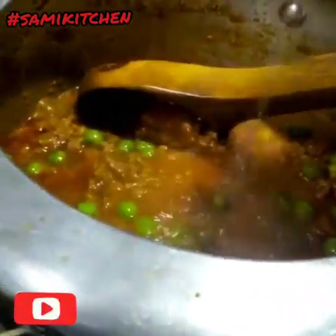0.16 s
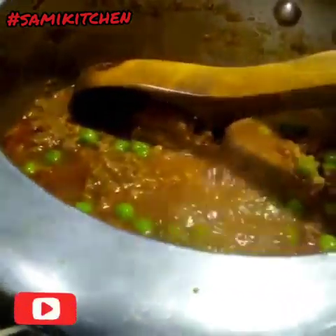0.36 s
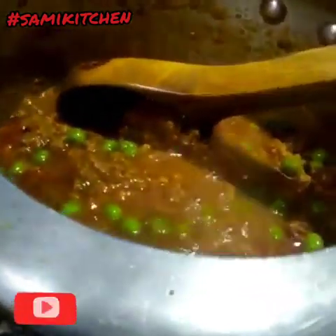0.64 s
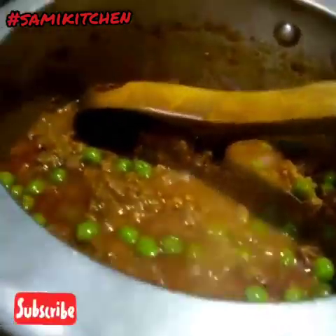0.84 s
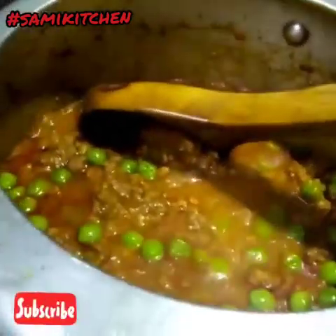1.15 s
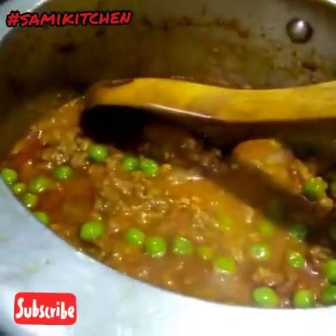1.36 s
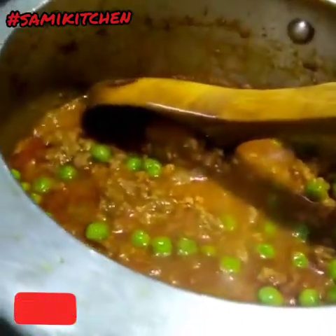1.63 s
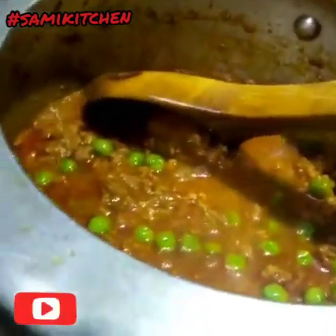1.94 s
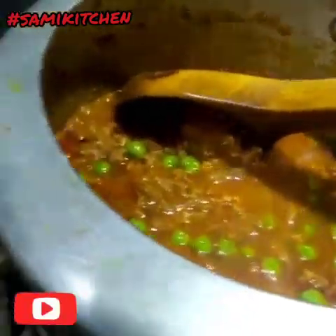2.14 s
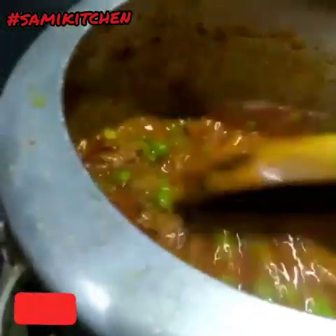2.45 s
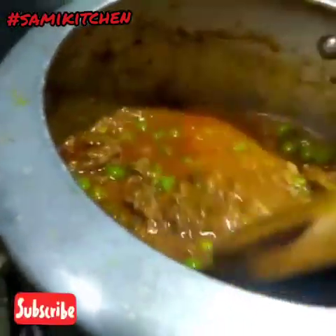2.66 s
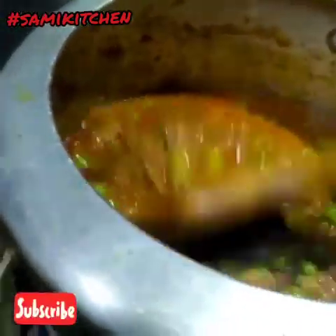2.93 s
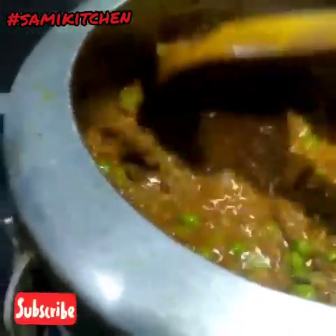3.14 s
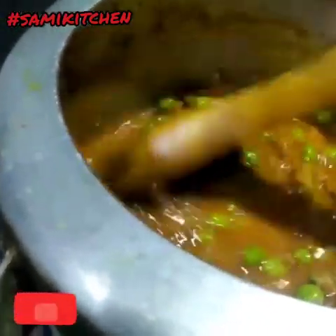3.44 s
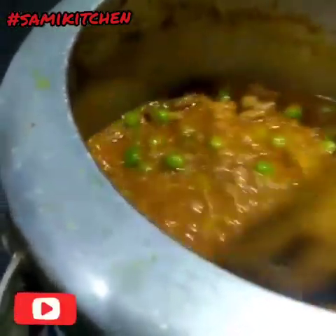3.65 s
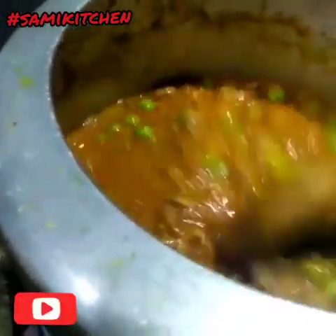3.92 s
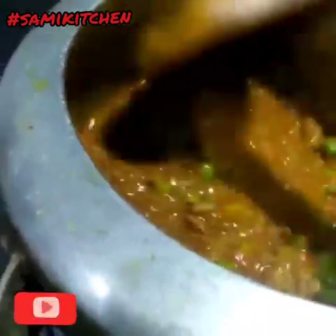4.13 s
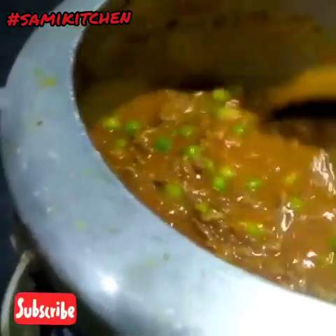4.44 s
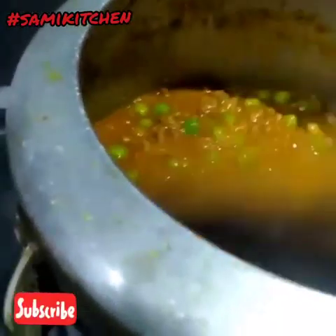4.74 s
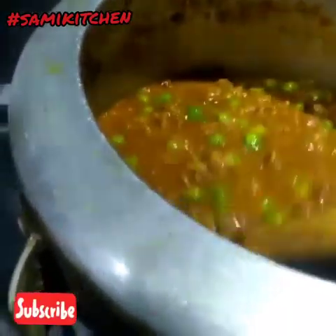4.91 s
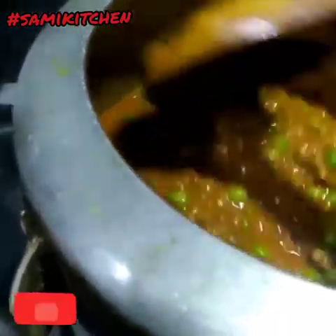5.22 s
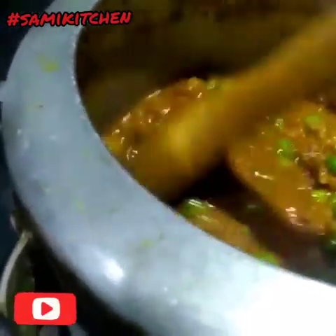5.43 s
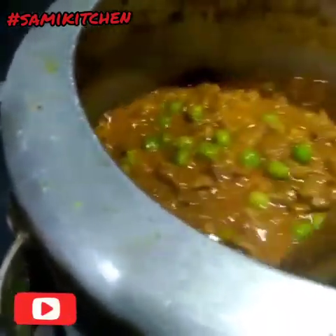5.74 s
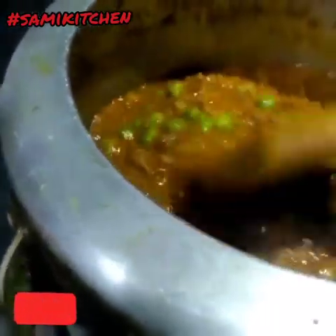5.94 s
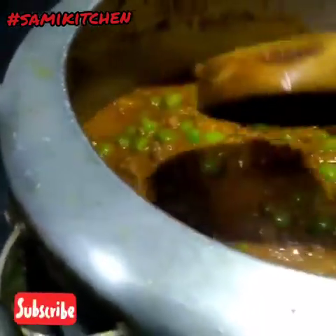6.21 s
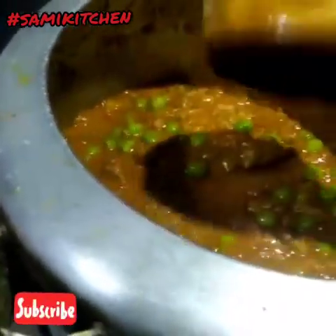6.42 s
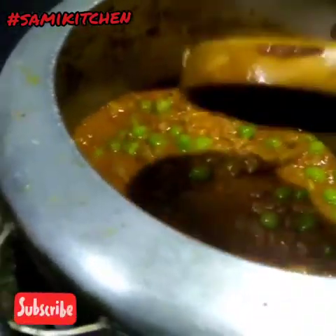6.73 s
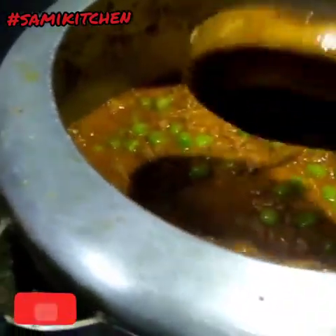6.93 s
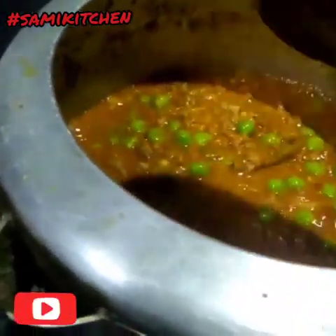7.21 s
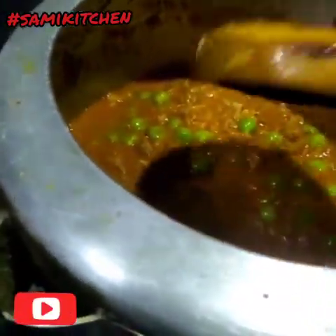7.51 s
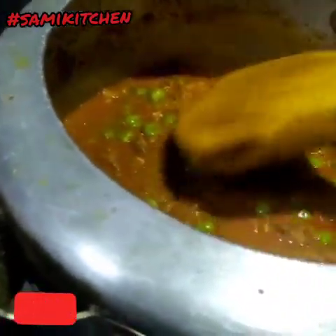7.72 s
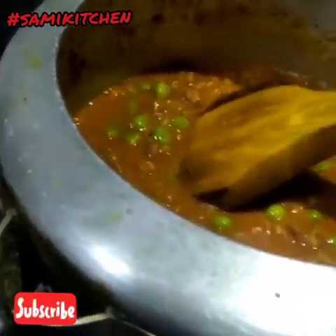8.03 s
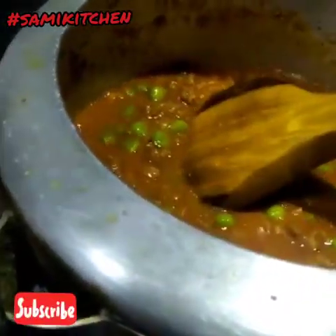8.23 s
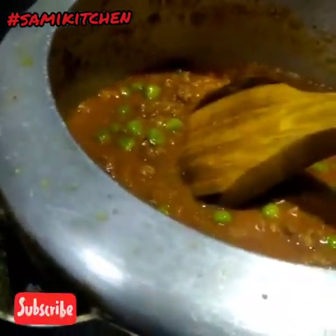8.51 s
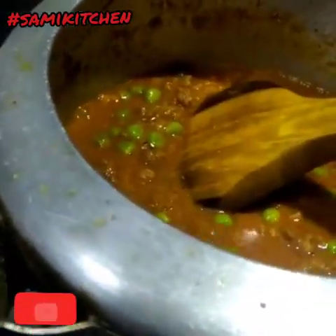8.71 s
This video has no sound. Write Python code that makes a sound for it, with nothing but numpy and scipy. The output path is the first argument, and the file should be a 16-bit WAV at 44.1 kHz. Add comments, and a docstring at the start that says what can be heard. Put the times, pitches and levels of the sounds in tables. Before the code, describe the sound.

Liquid pours with a hiss into a metal pot of stew, then a wooden spoon stirs, scrapes and thumps the rim, rattling the pot.

```python
"""Water is poured into a thick metal pot of stew; a wooden spoon then stirs, rubs and knocks the wall,
and is tapped on the rim so that the pot thuds and rattles on its stand. A small hard kitchen answers;
the microphone is near, dull above 4 kHz."""
import sys
import numpy as np
from scipy import signal
from scipy.fft import rfft, irfft, next_fast_len
from scipy.io import wavfile
from scipy.ndimage import uniform_filter1d, map_coordinates

SR = 44100
rng = np.random.default_rng(int(sys.argv[2]) if len(sys.argv) > 2 else 0)


def unload_audio(sound):
    """Save the sound as a 16-bit wav file, at the path given as the first command line argument."""
    columns = np.transpose(np.atleast_2d(sound))
    # keep every value between -1 and 1, then stretch to whole-number steps
    steps = np.round(np.clip(columns, -1, 1) * 32767)
    wavfile.write(sys.argv[1], SR, steps.astype(np.int16))


N = 391010

# knocks on the wall and rattles on the stand: (s, peak dB, strength near 900 Hz dB, near 1700 Hz dB, click dB)
KNOCKS = [(0.335, -32, -8, -42, -10), (1.235, -24.5, -22, -11, -34), (1.3, -28, -1.5, -5, -50), (1.336, -22.5, 5, 31, -25.5), (1.568, -20.5, 0.5, -2, -47),
          (1.61, -20.5, -4.5, -3.5, -56), (2.213, -39.5, -9, -20, -3), (2.706, -35, -23, -38, -26), (3.124, -44.5, -12, -18, -32),
          (3.65, -29, -25, -29, -14.5), (3.69, -32.5, -18, -18, -17), (3.747, -35, 0, -31, -32), (3.946, -26.5, -26, -4.5, -57), (4.259, -37, -44, -67, -36),
          (4.354, -25.5, 30, 26, -60), (4.427, -44, -23, -38, -6), (4.585, -22, -35, -27.5, -32), (4.936, -26, -54, -12.5, -15),
          (5.469, -11, -9, -19, -52), (5.725, -41, -21, -28.5, -45), (6.421, -12.5, -32, -18.5, -29.5), (6.478, -23.5, -14, -11, -29.5),
          (6.552, -31.5, -17, -18.5, -40), (6.617, -11.5, -19, -19, -29), (6.834, -15.5, -20, -10.5, -27), (6.849, -15.5, -5, -15.5, -30),
          (6.867, -25, -23.5, -15, -25.5), (6.921, -24, -15, -17.5, -35.5), (6.937, -39.5, -18, -16, -9.5), (7.016, -24, 1, -1, -20.5), (7.033, -16.5, -19.5, -15, -25.5),
          (7.48, -19, -3.5, -15.5, -21), (7.502, -18, -23, -12, -21), (7.655, -37, -22, -3.5, -50), (8.433, -44.5, 17, 13, -35)]
# the whole pot jolts on its stand: (s, peak dB, pitch Hz, rumble dB)
THUDS = [(1.2, -37, 289, -22), (2.753, -28.5, 214, -14), (3.941, -23, 213, -9), (4.349, -27, 460, -35), (5.48, -29.5, 366, -27), (6.408, -14.5, 220, -14.5), (6.607, -12, 222, -8.5),
         (6.825, -11.5, 221, -28), (6.849, -16, 369, -4.5), (7.006, -13, 230, -9.5), (7.476, -10.5, 328, -10.5), (7.494, -12, 218, -14)]
# modes of the wall: (Hz, dB)
POT = [(590, 17.5), (770, 10.5), (860, 4), (955, 15.5), (1080, 6), (1225, 6), (1350, 5), (1435, 6), (1760, 0.5), (1970, 6), (2130, 7), (2390, -2),
       (2620, -16), (2800, 4.5), (2930, -6), (3090, -4.5), (3185, 1.5), (3330, -6), (3540, 1), (3750, -1), (4000, -0.5), (4300, -8.5)]
BODY = [(171, 32, -12.5), (224.6, 16, -4.5), (271, 12, -2), (373, 52, 8.5), (515, 23, -2.5)]  # pot and stand: (Hz, width Hz, dB)
FIZZ = [(2650, -14.5), (4500, -3.5), (4790, -9.5), (5380, -5), (6240, -6), (7940, -10), (12200, -4.5), (15800, -10)]  # (Hz, dB per Hz)
HUSH = [(12, -38), (20, -7), (101, 3), (247, -4), (496, -1), (1180, -14.5), (1390, -12.5), (1900, -21), (3220, -16.5),
        (5040, -31.5), (15800, -28.5)]  # flame and room: (Hz, dB per Hz)
HUSH_DB = -55.5
KITCHEN = [(200, 0.33), (1000, 0.29), (3000, 0.28), (8000, 0.22)]  # (Hz, t60 s)
TOP_HZ = 15800  # fixed
# one pitch sings out of the wet wall for a moment: (s, length s, Hz, dB)
NOTES = [(0.02, 0.84, 2157, -41.5), (0.091, 0.21, 763, -42), (0.13, .06, 600, -42), (0.18, .12, 960, -46), (0.296, 0.15, 1410, -51.5), (0.358, 0.66, 2138, -49.5), (0.508, 0.049, 1376, -40),
         (0.534, 0.38, 2770, -55), (0.777, 1, 3550, -56.5), (1.03, 0.21, 3080, -47.5), (1.033, 0.1, 2120, -49.5), (1.195, 0.053, 1430, -44), (1.48, 0.076, 3560, -54),
         (1.976, 0.12, 2117, -52), (2.047, 0.47, 1415, -47), (2.422, 0.13, 2010, -55), (2.426, 0.059, 2746, -45.5),
         (2.532, 0.15, 1223, -48), (2.543, 0.11, 2030, -57), (2.739, 0.082, 1026, -43), (2.75, 0.058, 1930, -39.5),
         (2.751, 0.3, 1243, -50.5), (2.937, 0.084, 3030, -50.5), (3.109, 0.1, 969, -47.5), (3.154, 0.085, 1730, -49.5), (3.326, 0.057, 954, -47.5),
         (3.524, 0.24, 2916, -52.5), (3.66, 0.18, 1205, -38), (3.638, 0.078, 1997, -38.5), (3.674, 0.19, 3950, -54),
         (4.335, 0.045, 2150, -51), (4.432, 0.1, 2800, -59.5), (4.626, 0.2, 1196, -45), (4.653, 0.15, 2393, -44), (5.022, 0.095, 1840, -46), (5.047, 0.2, 1274, -47),
         (5.128, 0.1, 4004, -53), (5.134, 0.13, 3290, -56), (5.187, 0.12, 2120, -49.5), (5.664, 0.13, 1214, -44.5), (5.716, 0.043, 2125, -43.5),
         (5.733, 0.43, 2860, -62), (5.928, 0.37, 3210, -51.5), (6.196, 0.035, 1420, -53.5), (7.116, 0.61, 4325, -56), (7.14, 0.058, 2183, -49.5), (7.296, 0.026, 2190, -56),
         (7.429, 0.048, 2190, -47), (7.645, 0.051, 1087, -45), (7.647, 0.074, 358.6, -43), (7.787, 0.06, 1420, -55),
         (7.918, 0.088, 5350, -64), (7.949, 0.54, 4230, -60), (8.129, .03, 2260, -55), (8.325, 0.27, 3470, -62), (8.399, 0.085, 1420, -48.5), (8.46, .06, 3900, -61), (8.517, 0.041, 3430, -56), (8.565, 0.12, 1340, -42.5),
         (8.671, 0.076, 3510, -47.5), (8.772, 0.22, 4050, -54.5), (8.774, 0.065, 1407, -46), (8.819, 0.05, 985, -48)]
RUMBLE = [(96, 13, -1.5), (176, 33, -2)]  # stove top: (Hz, width Hz, dB)
# unevenness: lumps in a note dB, hum wavering dB, ring patches dB, fizz streaks dB, slips of the spoon dB
LUMP_DB, HUM_WAVER_DB, STREAK_DB, FIZZ_STREAK_DB, SLIP_DB = 4.5, 3.5, 5.5, 5, 2.5  # fixed
CRACK, BLOW_RISE = 1.2, .0014  # fixed
RIM_HZ = [5010, 5520, 6110, 6800, 7500, 8680, 10000, 11670, 11200]  # thin high modes that colour the fizz
# the poured stream dwindles: (s, flow dB)
POUR = [(0, -28.5), (0.17, -26.5), (0.42, -29.5), (0.7, -38), (1.0, -42), (1.5, -49.5), (2.1, -66.5)]
POUR_LOW_DB, POUR_MID_DB, POUR_FIZZ_DB, FIZZ_FOLLOWS = -15.5, -9.5, -18.5, 0.75  # over the high ring; the fizz dies slower than the flow
# the spoon drags along the wall: (s, length s, low ring dB, high ring dB, wet fizz dB)
STROKES = [(1.248, 0.11, -23.5, -28.5, -62), (2.203, 0.13, -53, -60, -61), (2.394, .12, -39.5, -50, -62.5), (2.51, 0.11, -63, -58, -56.5),
           (2.631, 0.15, -43.5, -38, -59.5), (2.963, 0.096, -43.5, -52.5, -55), (3.325, 0.24, -51.5, -54, -67), (3.642, .18, -37, -35.5, -59),
           (3.946, .12, -32.5, -47, -73), (4.256, 0.065, -55, -58, -70), (4.37, 0.044, -39, -76, -71), (4.6, 0.1, -36, -39, -58.5), (4.732, 0.07, -34, -42, -57.5),
           (4.957, .1, -69, -34, -58), (5.136, 0.12, -35, -52, -72.5), (5.568, 0.2, -36.5, -64, -78), (5.888, 0.6, -61.5, -69, -92),
           (7.658, 0.08, -54.5, -55, -83), (7.902, .08, -75, -67, -70), (8.42, 0.3, -64, -69, -73), (8.727, 0.19, -43, -61, -76)]
STROKE_ATTACK_S, STROKE_SAG_DB, STROKE_FADE_DB_PER_S, STROKE_MID_DB = 0.04, 4, 190, -13.5  # middle ring: over the mean of low and high
TOP_DB, TOP_FOLLOWS = -14, 0.52  # strength near 4 kHz, and how far it follows the strength near 1700 Hz
DULLING = 1.1  # dB lost above 2 kHz for each dB that a soft blow gains near 900 Hz
CLICK_RISE_S = 0.0031
NOTE_PEAK_SHARE, NOTE_SWELL_DB, NOTE_END_DB = 0.24, 2, -3  # loudest at this share of the length
BLIPS, BLIP_DB, BLIP_SPREAD_DB, BLIP_S, BLIP_FOLLOWS = 420, -36.5, 3, 0.028, 0.47  # count, level over the motion, scatter, life, growth with motion
BLIP_WAVER, BLIP_LUMP_DB = 1.2, 5  # fixed


def amp(db):
    return 10 ** (np.asarray(db) / 20)


def unit(x):
    return x / np.sqrt(np.mean(np.abs(x) ** 2) + 1e-20)


def along(points, hz):
    """(Hz, value) points on a log axis."""
    f, v = np.transpose(points)
    return np.interp(np.log(hz + 1), np.log(f + 1), v)


def filtered(x, response):
    """x times a complex response of frequency."""
    m = next_fast_len(len(x) + 8192)  # fixed
    return irfft(rfft(x, m) * response(np.fft.rfftfreq(m, 1 / SR)), m)[:len(x)]


def ringing(modes, extra_db=0):
    """Causal response of a set of modes, each raised by its own extra level."""
    c, w, db = np.transpose(modes)[:, :, None]
    gain = amp(db + np.reshape(extra_db, (-1, 1))) * (-1.) ** np.arange(len(modes))[:, None]
    return lambda f: np.sum(gain * 1j * f * w / (c * c - f * f + 1j * f * w), axis=0)


def wobble(rate, size):
    """Smooth random curves at every sample, rate knots a second."""
    knots = rng.standard_normal((size, int(N * rate / SR) + 4))
    return np.array([map_coordinates(k, [np.arange(N) * rate / SR], order=1) for k in knots])


def echoing(burst):
    """A new diffuse kitchen tail for one burst, each frequency dying at its own speed."""
    hz, t, z = signal.stft(rng.standard_normal(len(burst)), SR, nperseg=256)  # fixed
    tail = signal.istft(z * amp(-60 * t / along(KITCHEN, hz)[:, None]), SR, nperseg=256)[1]  # fixed
    return signal.fftconvolve(burst, tail / np.linalg.norm(tail))[:len(burst)]


def add(out, s, sound):
    """Mix a sound in at s seconds."""
    part = out[round(s * SR):][:len(sound)]
    part += sound[:len(part)]


def stirring():
    """Lumpy friction rings the wall modes in drifting patches; wet food fizzes on top."""
    slips = amp(SLIP_DB * wobble(45, size=1)[0] + 4.4 * wobble(300, size=1)[0]) * rng.standard_normal(N)
    grains = amp(3.6 * wobble(900, size=1)[0] + 2.0 * wobble(25, size=1)[0]) * rng.standard_normal(N)
    hz, t, z = signal.stft([unit(slips), unit(grains)], SR, nperseg=1024, noverlap=768)  # fixed
    low, mid, high, wetness = motion(t)
    metal = np.abs(wall()(hz))[:, None] + 0.14  # the splash itself fills the gaps between modes
    rim = 1.1 + np.abs(ringing([(f, 130, -.5) for f in RIM_HZ])(hz))
    gain = 0
    for level, centre_hz, span in (low, 1100, .35), (mid, 2100, .15), (high, 3300, .3):
        shape = metal * np.exp(-(np.log((hz[:, None] + 1) / centre_hz) / span) ** 2)
        gain = gain + level * shape / np.sqrt(np.mean(shape ** 2, axis=0))
    fizz = wetness * unit(rim * amp(along(FIZZ, hz)))[:, None]
    streaks = [unit(uniform_filter1d(uniform_filter1d(v, size=4, axis=0), size=14, axis=1)) for v in rng.standard_normal(z.shape)]
    wet = z[0] * gain * amp(STREAK_DB * streaks[0] - 9.5) + z[1] * fizz * amp(FIZZ_STREAK_DB * streaks[1] - 2.5)
    return signal.istft(wet, SR, nperseg=1024, noverlap=768)[1][:N]  # fixed


def knocks():
    """A rough blow cracks, then rings every mode at a new strength; the kitchen carries the tail."""
    out, t = np.zeros(N), np.arange(SR // 2) / SR
    for s, db, low_db, mid_db, click_db in KNOCKS:
        dull_db = DULLING * max(low_db, 0)
        top_db = TOP_DB + TOP_FOLLOWS * mid_db - dull_db
        blow = amp(-60 * t / 0.029) * (1 - np.exp(-t / BLOW_RISE)) * rng.standard_normal(len(t))
        spot = [(200, low_db - 55), (600, low_db - 18 + .5 * dull_db), (800, low_db), (1350, mid_db), (2050, mid_db - dull_db), (2900, -4.0), (4000, top_db), (5200, top_db - 17), (9000, -68)]
        ring = filtered(blow, wall(along(spot, np.transpose(POT)[0]) + 2 * rng.standard_normal(len(POT))))
        crack = filtered(blow, lambda f: amp(along(spot, f)))
        click = filtered(blow * (1 - np.exp(-t / CLICK_RISE_S)), lambda f: amp(along(FIZZ, f)) / (1 + (f / 12500) ** 6))  # wood is a dull hammer
        knock = amp(db) * np.clip(t / BLOW_RISE, 0, 1) ** 2 * (peaked(ring) + CRACK * peaked(crack) + amp(click_db) * peaked(click))
        add(out, s, knock + amp(-1.0) * echoing(knock))
    return out


def thuds():
    """A soft, rough push a few ms long sets pot, stand and stove top swinging."""
    out, t = np.zeros(N), np.arange(SR // 2) / SR
    for s, db, hz, rumble_db in THUDS:
        swell = (t / .005) * np.exp(1 - t / 0.0044)
        rough = filtered(rng.standard_normal(len(t)), lambda f: 1 / (1 + (f / 600) ** 4) / (1 + (90 / (f + 1)) ** 4))
        push = swell * (np.sin(2 * np.pi * hz * t) + 0.4 * unit(rough))
        swing = peaked(filtered(push, ringing(BODY)) + 0.6 * push)
        under = peaked(filtered(swell * np.sin(2 * np.pi * 130 * t), ringing(RUMBLE)))
        jolt = amp(db) * filtered(swing + amp(rumble_db) * under, lambda f: (1j * f / (70 + 1j * f)) ** 2)  # too small to radiate deep bass
        add(out, s, jolt + amp(-2) * echoing(jolt))
    return out


def hush():
    """Steady flame and room noise with an unsteady hum."""
    noise = unit(filtered(rng.standard_normal(N), lambda f: amp(along(HUSH, f))))
    hum = np.sin(2 * np.pi * 100 * np.arange(N) / SR + 2.8 * wobble(23, size=1)[0]) * amp(-64.5 + HUM_WAVER_DB * wobble(5.3, size=1)[0])
    return amp(HUSH_DB) * noise + hum


def notes():
    """Each note is a narrow, unsteady tone that swells and fades in lumps."""
    out = np.zeros(N)
    drift, flutter = wobble(130, size=2)
    lumps = wobble(30, size=1)[0]
    for (s, length, hz, db), start in zip(NOTES, rng.integers(0, N - SR, len(NOTES))):
        t = np.arange(round((abs(length) + 0.11) * SR)) / SR
        swell_db = np.interp(t, [0, .012, max(NOTE_PEAK_SHARE * length, .013), abs(length) + 0.0036, abs(length) + 0.056], [-40, 0.5, NOTE_SWELL_DB, NOTE_END_DB, -28.5])
        part = slice(start, start + len(t))
        rough = 1 / (1 + (hz * length / 1100) ** 2)  # long high squeals hold steady
        strength = amp(db + swell_db + 6.3 * (0.4966 + 0.51 * rough) * flutter[part] + LUMP_DB * rough * lumps[part])
        add(out, s, strength * np.sin(2 * np.pi * hz * t + 1.03 * drift[part]))
    return out


def peaked(x):
    """x with the top of its envelope at 1."""
    return x / np.sqrt(2 * np.max(uniform_filter1d(x ** 2, size=200)))


def wall(extra_db=0):
    """The wall's response: food damps high modes more, and little is heard above the top mode."""
    modes = ringing([(hz, 35 + hz / 120, db) for hz, db in POT], extra_db)
    return lambda f: modes(f) / (1 + (f / 4700) ** 8) / (1 + (480 / (f + 1)) ** 4)


def motion(t):
    """Levels of low, middle and high ring and of the fizz: the stream plus every stroke (attack, sagging hold, fade)."""
    flow_db = np.interp(t, *np.transpose(POUR), right=-120)
    top_db = POUR[0][1]
    fizz_db = top_db + POUR_FIZZ_DB + FIZZ_FOLLOWS * (flow_db - top_db)
    power = amp([flow_db + POUR_LOW_DB, flow_db + POUR_MID_DB, flow_db, fizz_db]) ** 2
    for s, length, low_db, high_db, wet_db in STROKES:
        age = t - s
        shape_db = -STROKE_SAG_DB * np.clip(age / length, 0, 1) - STROKE_FADE_DB_PER_S * np.clip(age - length, 0, None)
        shape = np.clip(age / STROKE_ATTACK_S + 1, 0, 1) ** 2 * amp(shape_db)
        power += (amp([low_db, (low_db + high_db) / 2 + STROKE_MID_DB, high_db, wet_db])[:, None] * shape) ** 2
    return np.sqrt(power)


def blips():
    """Brief blips at random: each rings one mode of the wall for a moment, louder where the stew moves."""
    draw = rng.random((BLIPS, 4))
    start, t = draw[:, 0] * (N / SR), np.arange(SR // 8) / SR
    hz = np.transpose(POT)[0][(draw[:, 1] * len(POT)).astype(int)] * (1 + 0.0296 * (draw[:, 2] - .5))
    low, _, high, _ = motion(start)
    size = (low + high + amp(-63.5)) ** BLIP_FOLLOWS * amp(BLIP_DB - BLIP_SPREAD_DB * np.log(draw[:, 3] + 0.0011))
    out, (drift, lumps) = np.zeros(N), wobble(110, size=2)
    for s, f, g, life, pick in zip(start, hz, size, BLIP_S * (.5 + draw[:, 2]), (draw[:, 3] * (N - SR)).astype(int)):
        part = slice(pick, pick + len(t))
        tone = amp(BLIP_LUMP_DB * lumps[part]) * np.sin(2 * np.pi * f * t + BLIP_WAVER * drift[part])
        add(out, s, g * (t / life) * np.exp(1 - 2 * t / life) * tone)
    return out


def scene():
    return (stirring() + notes() + blips() + knocks() + thuds() + hush())[None]


def record(dry):
    """The small microphone loses the deep bass; nothing is kept above the band limit."""
    return filtered(dry[0], lambda hz: 1j * hz / (28 + 1j * hz) * (hz < TOP_HZ))[None]


dry = scene()
out = record(dry)
unload_audio(out)
```